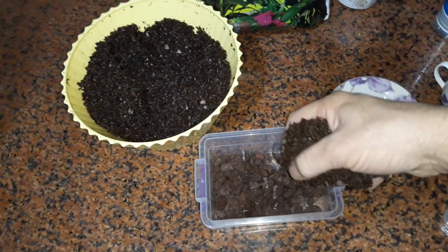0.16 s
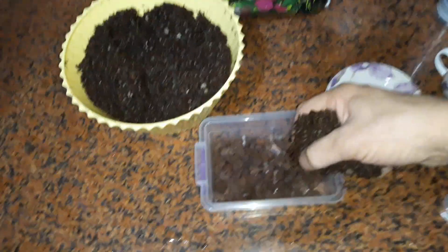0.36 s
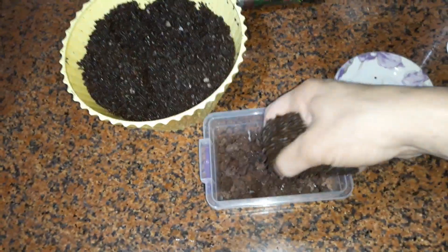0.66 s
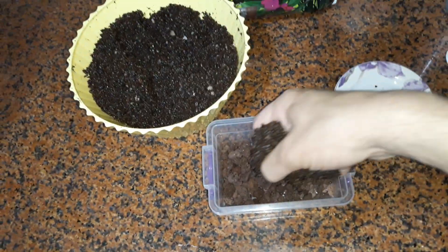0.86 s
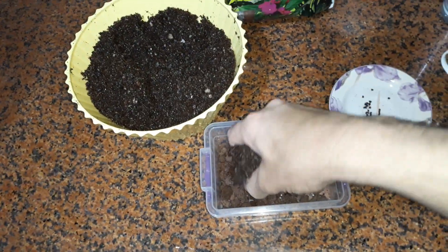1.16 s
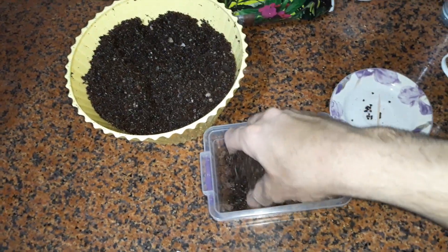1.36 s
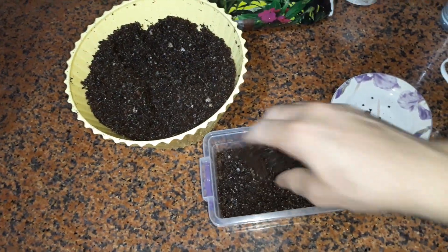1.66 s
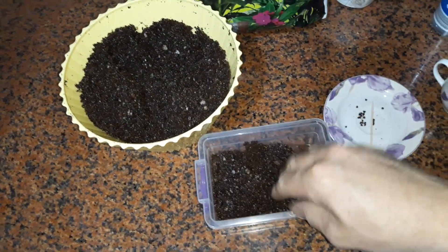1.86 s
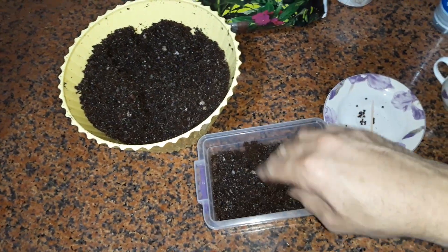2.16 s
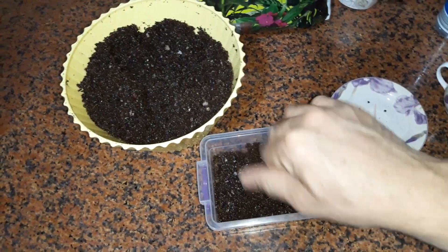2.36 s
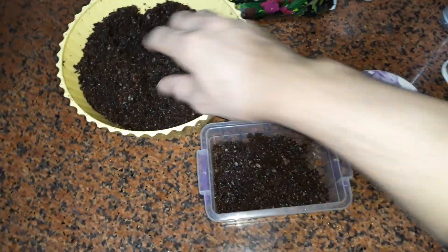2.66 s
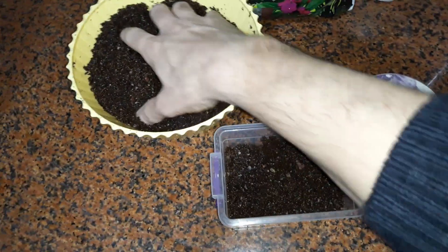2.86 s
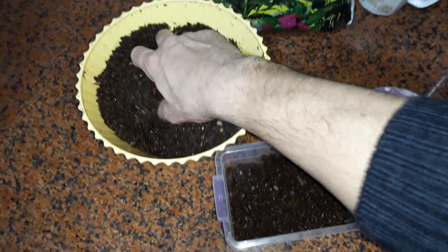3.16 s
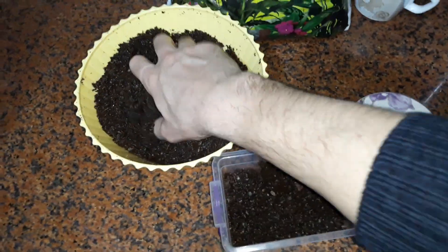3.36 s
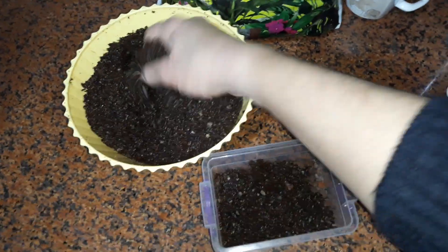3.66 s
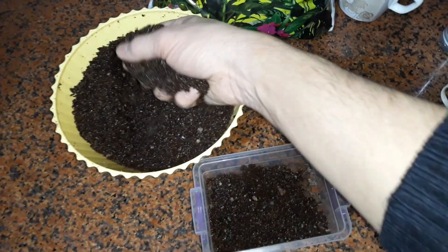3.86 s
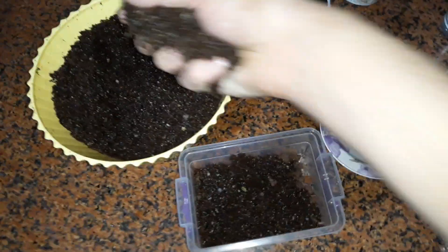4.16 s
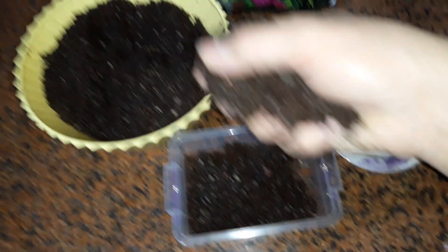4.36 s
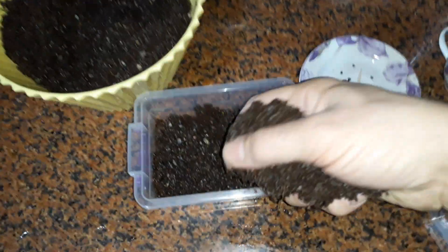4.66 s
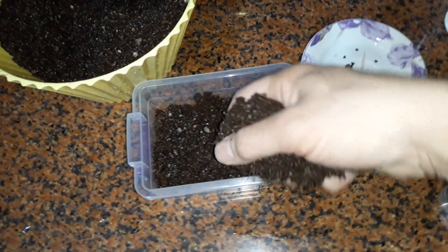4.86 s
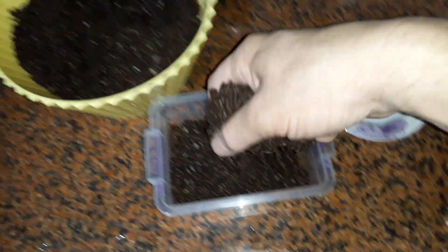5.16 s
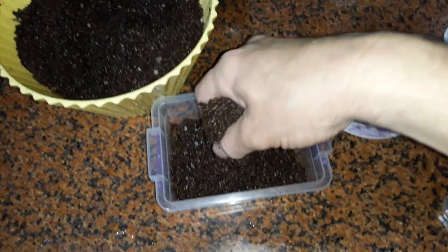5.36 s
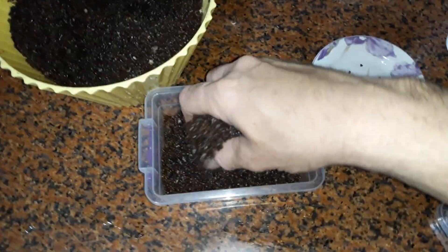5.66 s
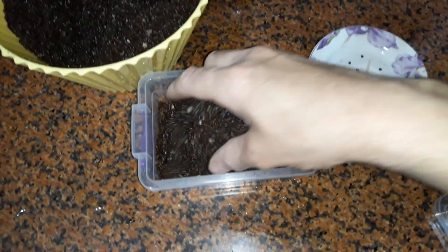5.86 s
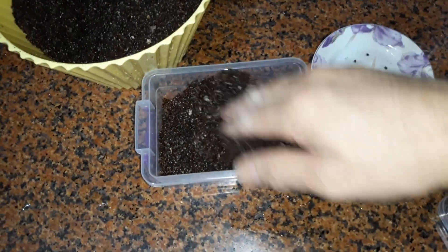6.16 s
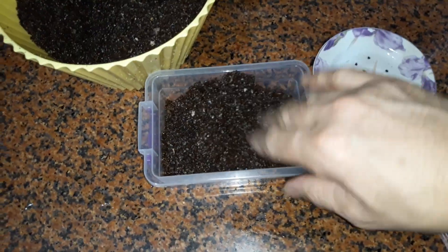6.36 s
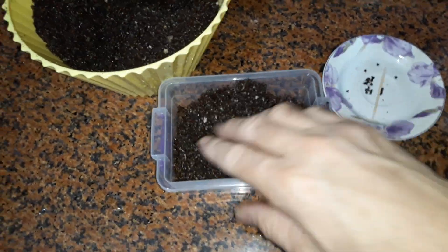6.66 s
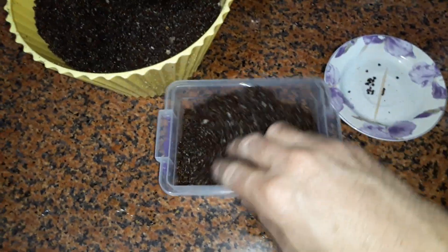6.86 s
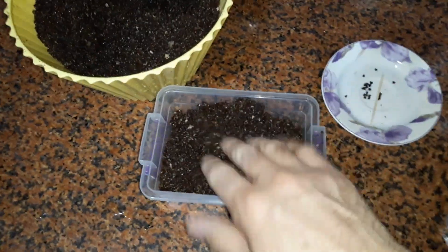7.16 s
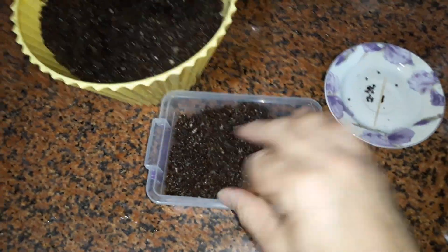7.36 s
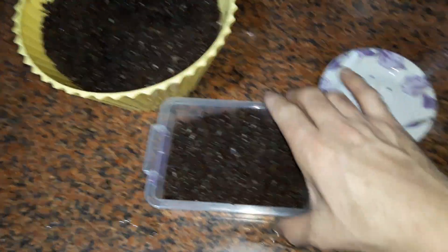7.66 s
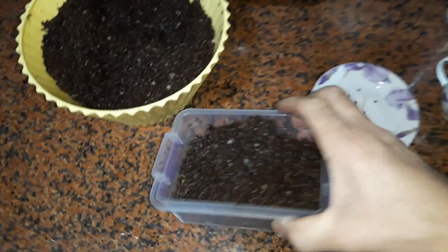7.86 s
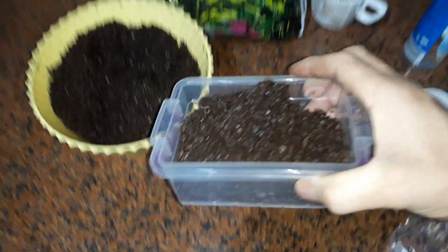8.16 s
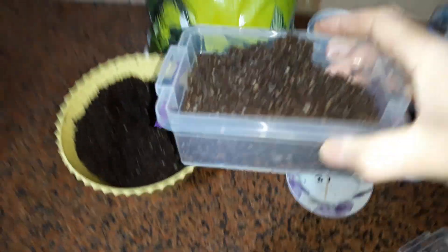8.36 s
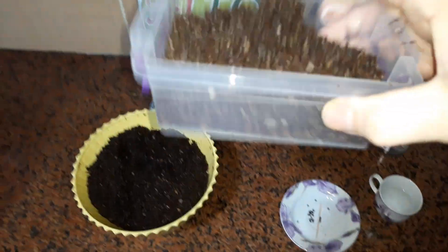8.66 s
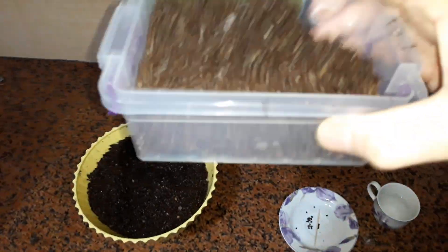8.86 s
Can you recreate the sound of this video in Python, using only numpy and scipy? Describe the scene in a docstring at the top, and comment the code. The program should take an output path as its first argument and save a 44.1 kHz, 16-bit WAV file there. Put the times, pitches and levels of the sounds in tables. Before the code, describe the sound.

Gritty potting soil is crumbled and patted into a small plastic box, which then knocks and is shaken in loud, rattling slaps.

```python
"""Potting soil in a plastic box

Gritty soil is crumbled by hand into a small plastic box on a stone counter, dug from a pot and patted flat.
The box knocks on the counter, is lifted and shaken so that the soil slaps against its walls.
Soil is a crowd of random tiny impacts shaped by spectra; blows are noise bursts that excite resonances.
A small room adds decaying noise tails; an appliance hums as a sine with bands of noise."""
import sys
import numpy as np
from scipy import signal
from scipy.fft import rfft, irfft, next_fast_len
from scipy.io import wavfile

SR = 44100
rng = np.random.default_rng(int(sys.argv[2]) if len(sys.argv) > 2 else 0)


def store_wav(level_fs):
    """Save 16-bit WAV to argv[1]."""
    pcm = np.round(np.clip(np.atleast_2d(level_fs), -1, 1) * 32767)
    wavfile.write(sys.argv[1], SR, pcm.T.astype(np.int16))


N = 397341  # length [samples]

# fingers rub and crumble soil; fine dry soil fizzes more:
# (start [s], length [s], level [dB], gain of the fizz [dB])
RUBS = [(0.01, 0.038, -59, -3), (0.305, 0.027, -53, -7), (0.46, 0.0069, -66.5, 3), (1.283, 0.18, -44, -5),
        (1.498, 0.039, -42, 4), (1.58, .16, -50, -1), (1.777, 0.031, -43, 1), (2.107, 0.021, -52, -5.5),
        (2.274, 0.018, -66, 2.5), (4.707, 0.13, -67.5, 2), (4.968, 0.043, -66.5, -4),
        (5.27, .48, -76.5, 6.5), (5.791, 0.14, -52, 2.5), (6.112, 0.027, -57, 4), (6.2, .03, -56, 0),
        (6.255, 0.042, -43.5, -2.5), (6.407, 0.019, -54, 2.5), (6.548, 0.021, -48.5, -0.5),
        (6.806, .02, -55, 2), (6.839, 0.097, -42, 2), (6.948, 0.048, -37, 2.5), (7.164, 0.036, -43, -3.5),
        (7.276, 0.22, -67, -1), (7.64, .07, -69, -2), (7.731, .12, -48, -3)]
# spectrum of the fine soil: (frequency [Hz], density [dB per Hz])
SOIL_SPECTRUM = [(350, -33.5), (600, -3), (790, -9.5), (1510, -4.5), (1660, -4), (2650, -10.5),
                 (2990, -12.5), (3990, -2), (6730, -7.5), (8050, -5), (9890, -17.5), (14900, -15),
                 (16000, -25)]
RUB_ATTACK_S, RUB_RELEASE_S = 0.043, 0.21  # times for a 60 dB rise and fall
FIZZ_HZ = 3570  # the fizz of the finest soil lies above this


def crumbling():
    """Granular friction: fine soil hisses between the fingers while coarser grit ticks."""
    impacts = contacts(rate=4000, spread_db=3.5) * clumps(rate=120, depth_db=4)
    fine = unit(through(impacts, response(SOIL_SPECTRUM)))
    coarse = grit(rate=700, spread_db=5, hz=4000, cycles=1.9)
    soil = amp(-2.5) * fine + amp(-6.5) * coarse
    # filtered both ways, so the fizz stays in phase with the soil it is added to
    fizz = signal.sosfiltfilt(signal.butter(2, FIZZ_HZ, "high", fs=SR, output="sos"), soil)
    out = np.zeros(N)
    for start, length, db, fizz_db in RUBS:
        pressure = stroke(start, length, db, RUB_ATTACK_S, RUB_RELEASE_S)
        out += pressure * (soil + (amp(fizz_db) - 1) * fizz)
    return out


# coarse crumbs that snap or hit the plastic:
# (time [s], relative tick level [dB], tick pitch [Hz], relative wall level [dB])
CRUMBS = [(0.308, -31.5, 4080, -34), (1.275, -19, 4700, -29), (1.3145, -14, 3650, -45),
          (1.3235, -20.5, 4000, -30), (1.367, -19, 2500, -27), (1.416, -19.5, 3920, -31.5),
          (1.5094, -25, 4670, -53), (1.5227, -22.5, 5140, -55), (1.5854, -19, 7800, -39),
          (1.7792, -19.5, 4600, -33), (1.8114, -15.5, 5600, -62), (2.1074, -36, 2600, -62),
          (4.812, -46.5, 4600, -62), (5.8475, -23, 5060, -46), (5.901, -27, 4430, -36.5),
          (6.118, -30, 8300, -59), (6.1669, -23, 4950, -38), (6.256, -20, 4870, -36),
          (6.2778, -21.5, 2640, -56), (6.4173, -33, 5140, -52), (6.5325, -30.5, 5060, -61),
          (6.557, -30.5, 4980, -39.5), (6.9407, -19.5, 4200, -43), (7.1814, -25, 4280, -33),
          (7.466, -38.5, 8700, -73)]
# spectrum of a hard snap, also heard in the knocks: (frequency [Hz], density [dB per Hz])
SNAP_SPECTRUM = [(60, -77.5), (300, -30.5), (1500, -4.5), (3000, -6), (4800, 4), (6300, -7), (8300, -3),
                 (10000, -18.5), (16000, -17)]
# spectrum of a struck plastic wall, also heard in the knocks: (frequency [Hz], density [dB per Hz])
WALL_SPECTRUM = [(100, -46.5), (400, -5.5), (600, -3), (900, 3), (1300, -1.5), (1900, -2.5), (2600, -8.5),
                 (5000, -26), (16000, -57)]


def crumbs():
    """Impact excitation: each crumb ticks at its own pitch and lightly taps the wall."""
    out = np.zeros(N)
    for s, tick_db, hz, wall_db in CRUMBS:
        snap = burst(SNAP_SPECTRUM, t60=0.025, rough=1.6)
        tap = burst(WALL_SPECTRUM, t60=0.063, rough=1.36)
        add(out, s, amp(tick_db + 11) * resonate(snap, hz, sharpness=4.2, share=0.79))
        add(out, s, amp(wall_db + 17.5) * resonate(tap, hz=1870, sharpness=4.3, share=0.74))
    return out


# fingers push into the pot:
# (start [s], length [s], relative grit level [dB], relative hollow level [dB], swell over the push [dB])
DIGS = [(2.735, 0.057, -57.5, -81, 10), (2.816, .12, -45, -46, -6.5), (2.966, 0.065, -49, -44, 5),
        (3.049, .11, -41, -37, -2.5), (3.313, 0.14, -65.5, -67, -1), (3.494, .03, -55.5, -58, -3)]
# spectrum of the soil deep in the pot: (frequency [Hz], density [dB per Hz])
POT_SPECTRUM = [(76, -60), (130, -34), (150, -16), (187, -9), (315, -7.5), (394, -11.5), (678, -0.5),
                (1060, -9), (1240, -15), (2670, -13), (2950, -13.5), (7750, -18.5), (10100, -26.5),
                (15100, -27.5), (16000, -29)]
DIG_ATTACK_S, DIG_RELEASE_S = 0.09, 0.17  # times for a 60 dB rise and fall


def digging():
    """Cavity coupling: fingers crunch through deep soil, and the pot booms hollowly under it."""
    impacts = contacts(rate=2500, spread_db=2) * clumps(rate=120, depth_db=2)
    crunch = through(impacts, response(POT_SPECTRUM))
    hollow = unit(signal.sosfilt(signal.butter(2, 1200, fs=SR, output="sos"), crunch))
    bright = signal.sosfilt(signal.butter(2, 1400, "high", fs=SR, output="sos"), crunch)
    coloured = unit(resonate(bright, hz=2500, sharpness=4, share=0.35))
    grains = grit(rate=640, spread_db=3.5, hz=2500, cycles=2.5)
    gritty = amp(-2.5) * coloured + amp(-10.5) * grains
    out = np.zeros(N)
    for start, length, grit_db, hollow_db, swell_db in DIGS:
        scratch = stroke(start, length, grit_db, DIG_ATTACK_S, DIG_RELEASE_S, swell_db)
        push = stroke(start, length, hollow_db, DIG_ATTACK_S, DIG_RELEASE_S, swell_db)
        out += scratch * gritty - amp(-2.5) * push * hollow
    return out


# the plastic is rubbed, dragged or gripped: (start [s], length [s], relative level [dB])
DRAGS = [(1.28, 0.14, -48.5), (1.66, .03, -46), (3.495, 0.031, -54.5), (4.8, 0.072, -66.5),
         (5.766, .16, -50.5), (6.011, 0.049, -51.5), (6.821, .12, -45.5), (6.998, 0.024, -33),
         (7.067, 0.02, -46.5), (7.714, .05, -54), (7.828, 0.072, -51), (7.97, .02, -34),
         (8.004, 0.018, -30), (8.076, 0.03, -40.5)]
# spectrum of the scraped plastic: (frequency [Hz], density [dB per Hz])
SCRAPE_SPECTRUM = [(110, -46), (180, -12.5), (310, -7.5), (622, -12.5), (905, 1), (1340, 0), (1850, -12.5),
                   (2400, -10.5), (2900, -13.5), (3770, -7.5), (9820, -31.5), (14300, -38), (16000, -47)]
DRAG_ATTACK_S, DRAG_RELEASE_S = 0.023, 0.19  # times for a 60 dB rise and fall


def dragging():
    """Stick-slip friction: the plastic catches and slips in tiny jerks."""
    jerks = contacts(rate=1800, spread_db=3) * clumps(rate=130, depth_db=3.5)
    scrape = unit(through(jerks, response(SCRAPE_SPECTRUM)))
    pressure = sum(stroke(s, length, db, DRAG_ATTACK_S, DRAG_RELEASE_S) for s, length, db in DRAGS)
    return amp(-1) * pressure * scrape


# knocks of the box: on the counter, under the fingers, and as soil lands hard while it is shaken;
# levels are relative within each column:
# (time [s], snap level [dB], wall and ring level [dB], wall pitch [Hz], thud level [dB])
KNOCKS = [(1.6582, -23, -28.5, 940, -30), (5.74, -56, -41, 820, -48), (6.03, -30.5, -26, 760, -38.5),
          (7.0, -20, -36, 1320, -36), (7.0599, -13, -23, 990, -55), (7.1903, -16, -25.5, 970, -40.5),
          (7.8228, -29, -33.5, 1100, -46), (7.9663, -17.5, -23.5, 1000, -34), (8.0037, -34, -22, 1120, -48),
          (8.0142, -31, -30, 1020, -41), (8.0254, -30, -23.5, 1460, -55), (8.1053, -41, -30, 940, -60),
          (8.2435, -19, -26.5, 1000, -31.5), (8.4677, -17.5, -21, 1030, -35), (8.8439, -5, -11, 1200, -36)]
# spectrum of the loaded bottom: (frequency [Hz], density [dB per Hz])
THUD_SPECTRUM = [(30, -39), (100, -17), (230, -6), (350, -0.5), (560, 3.5), (750, -13.5), (2000, -45),
                 (8000, -73)]


def knocks():
    """Modal impact: a snap, the clack of the wall, the ring of the box and the thud of its loaded bottom."""
    out = np.zeros(N)
    for s, snap_db, ring_db, wall_hz, thud_db in KNOCKS:
        wall = burst(WALL_SPECTRUM, t60=0.055, rough=1.67)
        add(out, s, amp(snap_db + 12) * burst(SNAP_SPECTRUM, t60=0.039, rough=1))
        add(out, s, amp(ring_db + 20) * resonate(wall, wall_hz, sharpness=5.6, share=1))
        add(out, s, amp(ring_db + 15.5) * box_ring(scatter_db=2, detune=0.005))
        add(out, s, amp(thud_db + 23.5) * burst(THUD_SPECTRUM, t60=0.054, rough=2.4))
    return out


# soil thrown against a wall by each shake; the rise is short when it lands as one lump:
# (time of impact [s], relative level [dB], time for a 60 dB rise [s])
SHAKES = [(8.348, -43, 0.3), (8.374, -34.5, 0.04), (8.442, -31, 0.08), (8.486, -26, 0.0256),
          (8.557, -31.5, 0.06), (8.599, -23.5, 0), (8.672, -23, .02), (8.7153, -22.5, .005),
          (8.7901, -15, 0.02), (8.844, -15, 0.02), (8.911, -14.5, .02), (8.968, -17, .012)]
# spectrum of the rushing soil: (frequency [Hz], density [dB per Hz])
SHAKEN_SPECTRUM = [(100, -70), (200, -33), (310, -14), (560, -19), (760, -8.5), (1050, -0.5), (1600, -9.5),
                   (1950, -3), (2500, -5.5), (4700, -7.5), (6300, -17), (8200, -17), (10000, -34),
                   (16000, -31.5)]


def shaking():
    """Mass impact: the soil slides, hits a wall as a cloud of impacts and settles; then it is thrown back."""
    throws = [throw(s, db, attack) for s, db, attack in SHAKES]
    motion = sum(throws)
    rush = through(motion * contacts(rate=7000, spread_db=3), response(SHAKEN_SPECTRUM))
    crackle = motion * grit(rate=2000, spread_db=3, hz=3500, cycles=1.8)
    lumps = contacts(rate=3000, spread_db=2)
    # opposite walls are hit in turn, each with its own mix of modes
    walls = sum(throws[0::2]), sum(throws[1::2])
    ring = sum(through(wall * lumps, box_ring(scatter_db=3, detune=0.002)) for wall in walls)
    return amp(-3.5) * rush + amp(-7) * ring + amp(-12) * crackle


LANDING_S, SETTLE_S = 0.0061, 0.076  # the landing holds, then takes this time for a 60 dB fall
SLIDE_DB, SLIDE_S = -13.5, 0.062  # the soil slides in first: level under the impact, time for a 60 dB rise
TRICKLE_DB = -24  # soil that keeps trickling between the throws: level under the impact


def throw(s, db, attack):
    """Inertial motion as gain per sample: the soil slides in, lands and trickles on."""
    slide = stroke(s - 0.002, 0.0025, db + SLIDE_DB, SLIDE_S, attack)
    landing = stroke(s, LANDING_S, db, attack, SETTLE_S)
    trickle = stroke(s, 0.0092, db + TRICKLE_DB, attack=0.058, release=0.12)
    return slide + landing + trickle


# modes of the soil-filled box: (nominal frequency [Hz], nominal relative level [dB], t60 [s])
BOX_MODES = [(795, -6, 0.04), (899, -4, 0.072), (943, 2, 0.032), (1048, 3.5, 0.046), (1184, -1, 0.055),
             (1381, 2, 0.049), (1505, -2, 0.039), (1860, -1.5, 0.038), (1940, -6, 0.039), (2064, -2, 0.061),
             (2237, -0.5, 0.042), (2880, -20, 0.018), (3380, -9.5, 0.05), (4100, -9, 0.021),
             (4600, 0, 0.025), (5540, -8, 0.039)]


def box_ring(scatter_db, detune):
    """Modal superposition, of energy 1; the load of soil shifts the modes each time."""
    t = np.arange(SR // 6) / SR
    ring = np.zeros(len(t))
    for hz, db, t60 in BOX_MODES:
        decay = amp(db + scatter_db * rng.normal() - 60 * t / t60)
        shifted_hz = hz * (1 + detune * rng.normal())
        ring += rng.choice([-1, 1]) * decay * np.sin(2 * np.pi * shifted_hz * t)
    # the ring carries no bass below about 450 Hz
    ring = signal.sosfilt(signal.butter(2, 450, "high", fs=SR, output="sos"), ring)
    return ring / np.linalg.norm(ring)


# the counter rumbles as the pot is pressed or the box is pulled off it: (start [s], length [s], level [dB])
RUMBLES = [(3.1, .07, -62), (8.0, .11, -53)]
# spectrum of the counter: (frequency [Hz], density [dB per Hz])
COUNTER_SPECTRUM = [(25, -14), (60, -10), (95, 4), (140, -6), (250, -18), (600, -46)]


def counter():
    """Structure-borne sound: a brief dull rumble of the work surface."""
    weight = sum(stroke(s, length, db, attack=0.1, release=0.15) for s, length, db in RUMBLES)
    return weight * noise(lambda f: amp(along(COUNTER_SPECTRUM, f)))


# decay of the room: (frequency [Hz], t60 [s])
ROOM_DECAY = [(300, 0.39), (800, .26), (2000, 0.25), (5500, 0.16), (14000, 0.17)]


def room(x, count=4):
    """Reverberation: a short tail that dies faster in the treble; four random tails take turns."""
    hz, t, z = signal.stft(rng.standard_normal((count, SR // 2)), SR, nperseg=256)
    decay = amp(-60 * t / along(ROOM_DECAY, hz)[:, None])
    tails = signal.istft(z * decay, SR, nperseg=256)[1]
    turn = np.arange(N) * count // SR % count  # each tail answers a quarter of every second
    delay = np.zeros(SR // 250)  # 4 ms before the tail
    out = np.zeros(N)
    for k, tail in enumerate(tails):
        out += through(x * (turn == k), np.r_[delay, tail / np.linalg.norm(tail)])
    return out


# spectrum of the drone: (frequency [Hz], density [dB per Hz])
DRONE_SPECTRUM = [(25, -4.5), (70, -9.5), (120, -3), (220, -11.5), (300, 0), (430, -1), (560, -11),
                  (650, -12.5), (900, -24), (2000, -59)]
# hollow tones in the drone: (frequency [Hz], half-width at half amplitude [Hz], rms level [dB])
DRONE_TONES = [(169, 21.6, -64), (509, 23.6, -55)]
# spectrum of the hiss: (frequency [Hz], density [dB per Hz])
HISS_SPECTRUM = [(410, -29.5), (700, 0), (898, -18.5), (1090, -9.5), (1350, -18), (6320, -19), (8210, -22),
                 (9600, -28.5), (15000, -18.5), (16000, -26.5)]
MAINS_HZ = 100


def appliance():
    """Steady radiation: mains hum, a low drone with hollow tones, and faint hiss."""
    hum = amp(-58) * np.sqrt(2) * np.sin(2 * np.pi * MAINS_HZ * np.arange(N) / SR)
    out = hum + amp(-59) * noise(lambda f: amp(along(DRONE_SPECTRUM, f)))
    for hz, width, db in DRONE_TONES:
        out += amp(db) * noise(lambda f: 1 / (1 + ((f - hz) / width) ** 2))
    return out + amp(-70) * noise(lambda f: amp(along(HISS_SPECTRUM, f)))


def contacts(rate, spread_db):
    """Random (Poisson-like) tiny impacts of rms 1, rate per second: many weak, a few strong."""
    moment, rarity, side = rng.random((int(rate * N / SR), 3)).T
    size = amp(-spread_db * np.log(np.maximum(rarity, np.exp(-4))))  # at most 4 spreads strong
    return unit(np.bincount((moment * N).astype(int), size * np.sign(side - 0.5), N))


def clumps(rate, depth_db):
    """Random modulation of gain, rate per second: soil gives way in small lumps."""
    swells = amp(depth_db * rng.standard_normal(int(N * rate / SR) + 2).clip(-2, 2))
    return unit(np.interp(np.arange(N) * (rate / SR), np.arange(len(swells)), swells))


def grit(rate, spread_db, hz, cycles, count=5):
    """Size-dependent resonance: each grain size ticks at its own pitch and comes in its own clumps."""
    t = np.arange(SR // 100) / SR
    out = np.zeros(N)
    for pitch in np.minimum(hz * 2 ** np.linspace(-1, 1, count), SR / 2):
        tick = unit(np.cos(2 * np.pi * pitch * t) * np.exp(-pitch * t / cycles))
        impacts = contacts(rate / count, spread_db) * clumps(rate=60, depth_db=6)
        out += through(impacts, tick)
    return unit(out)


def burst(spectrum, t60, rough):
    """Transient excitation: one sharp impact with a quickly dying rattle, of energy 1."""
    t = np.arange(SR // 10) / SR
    rattle = amp(-60 * t / t60) * rng.standard_normal(len(t))
    blow = (t == 0) + rough * rattle / np.linalg.norm(rattle)
    sound = through(blow, response(spectrum))
    return sound / np.linalg.norm(sound)


def resonate(sound, hz, sharpness, share):
    """Resonance: a sound coloured by one peak, of energy 1."""
    ring = signal.lfilter(*signal.iirpeak(hz, sharpness, fs=SR), sound)
    mixed = sound + share * ring / np.linalg.norm(ring)
    return mixed / np.linalg.norm(mixed)


def stroke(start, length, db, attack, release, swell_db=0):
    """Envelope of one movement: gain rises, holds or swells, and dies away exponentially."""
    t = np.arange(N) / SR - start
    outside = np.maximum(-t / attack, (t - length) / release).clip(0, 3)  # in units of 60 dB
    swell = swell_db * (np.clip(t / length, 0, 1) - 0.5)
    return amp(db + swell - 60 * outside)


def noise(shape):
    """Spectral shaping: steady noise of rms 1 whose gain is a function of frequency."""
    spectrum = rfft(rng.standard_normal(N)) * shape(np.fft.rfftfreq(N, 1 / SR))
    return unit(irfft(spectrum, N))


def response(spectrum, size=4096):
    """Minimum phase: the causal impulse response of energy 1 with the given spectrum."""
    gain = amp(along(spectrum, np.fft.rfftfreq(size, 1 / SR)))
    cepstrum = irfft(np.log(gain + 1e-6))
    cepstrum[1:size // 2] *= 2  # folding the cepstrum forward makes the response causal
    cepstrum[size // 2 + 1:] = 0
    h = irfft(np.exp(rfft(cepstrum)))
    return h / np.linalg.norm(h)


def through(x, h):
    """Convolution: x played through an impulse response."""
    return signal.oaconvolve(x, h)[:len(x)]


def along(points, hz):
    """Logarithmic frequency scale: (frequency [Hz], value) points interpolated at hz."""
    f, v = np.transpose(points)
    return np.interp(np.log(hz + 1), np.log(f + 1), v)


def amp(db):
    """Decibel scale: level to amplitude gain."""
    return 10 ** (np.asarray(db) / 20)


def unit(x):
    """Effective value: x at rms 1."""
    return x / np.sqrt(np.mean(x ** 2) + 1e-20)


def add(track, s, sound):
    """Superposition: mix a sound into a track at time s."""
    part = track[max(round(s * SR), 0):][:len(sound)]
    part += sound[:len(part)]


def scene():
    """Superposition of direct and reverberant sound: all the handling in its room, over the hum."""
    soil = crumbling() + crumbs() + digging() + shaking()
    handling = soil + dragging() + knocks() + counter()
    return (handling + amp(-10.5) * room(handling) + appliance())[None]


TOP_HZ = 16000  # band limit of the recorder


def record(dry):
    """Band limiting: the small microphone loses the deep bass, the recorder all above its limit."""
    thin = signal.sosfilt(signal.butter(3, 70, "high", fs=SR, output="sos"), dry)
    size = next_fast_len(N + SR // 2)
    passband = np.fft.rfftfreq(size, 1 / SR) < TOP_HZ
    return irfft(rfft(thin, size) * passband, size)[:, :N]


dry = scene()
out = record(dry)
store_wav(out)
```